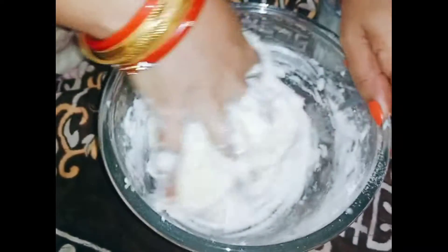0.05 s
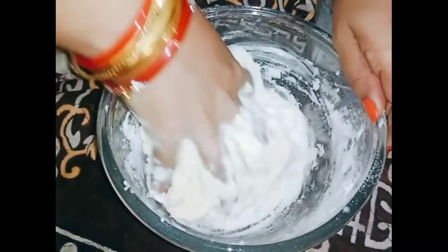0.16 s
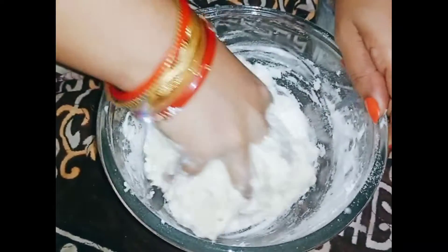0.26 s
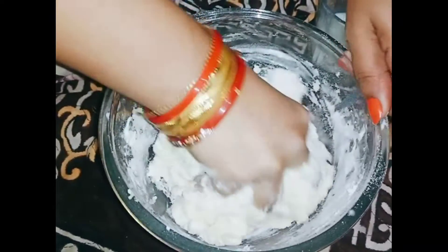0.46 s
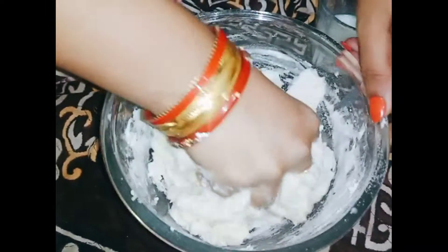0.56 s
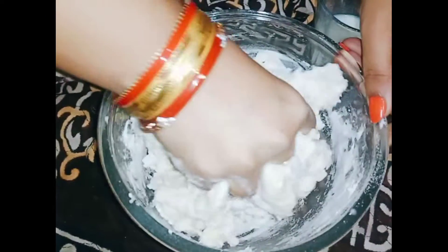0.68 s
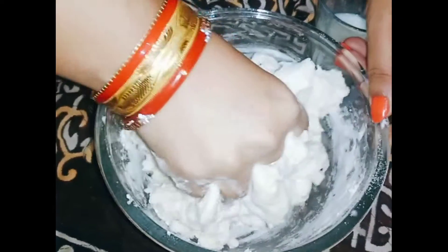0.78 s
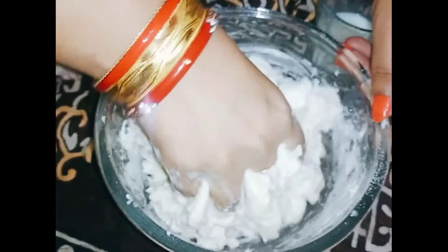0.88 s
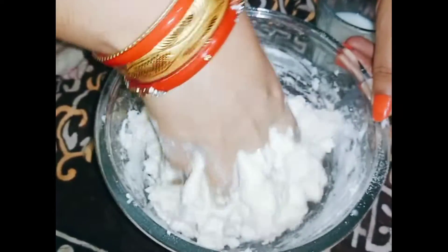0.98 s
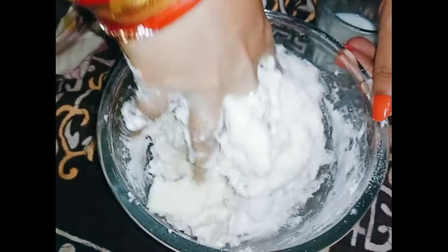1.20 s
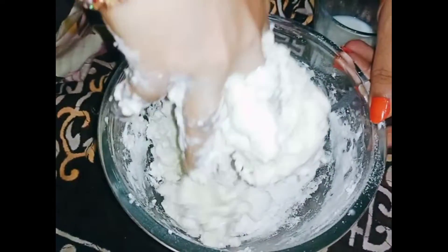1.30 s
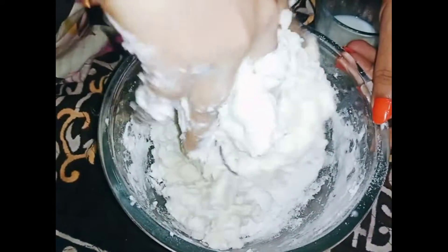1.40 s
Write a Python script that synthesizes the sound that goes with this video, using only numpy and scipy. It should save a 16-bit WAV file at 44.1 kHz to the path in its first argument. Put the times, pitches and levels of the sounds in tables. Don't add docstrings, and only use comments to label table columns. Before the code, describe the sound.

Dough kneading in a glass bowl, heard close in a small room: bright wet crackle and sticky snaps with a low hum at 0-0.1 s. Bangles click near 0.23 s, then strike the bowl sharply at 0.35-0.37 s, the glass ringing and chattering briefly. More clinks come at 0.53-0.6 s. Dense snaps and squelch follow at 0.63-0.85 s with a soft thud, then sparse faint ticks fade towards 1.4 s.

```python
import sys
import numpy as np
from scipy import signal
from scipy.fft import rfft, irfft
from scipy.io import wavfile

SR = 44100
rng = np.random.default_rng(int(sys.argv[2]) if len(sys.argv) > 2 else 0)


def master_out(mix):
    frames = np.transpose(np.atleast_2d(mix))
    ceiling = np.clip(frames, -1, 1)
    pcm = np.round(ceiling * 32767).astype(np.int16)
    wavfile.write(sys.argv[1], SR, pcm)


def invert_db(x):
    u = np.asarray(x, float) / 20
    return 10 ** u


N = 63945
MODE_SCATTER_DB = 3


def unit_power(x):
    return x / np.sqrt(np.mean(x ** 2) + 1e-20)


def in_time(rows):
    s, *columns = np.transpose(rows)
    return [np.interp(np.arange(N) / SR, s, column) for column in columns]


def clicks(s, db):
    out = np.full(N, 1e-18)
    np.add.at(out, (np.asarray(s) * SR).astype(int), invert_db(db))
    return out


def grains(rate):
    size_db = 4.0 * np.minimum(rng.exponential(1, N), 3)
    return invert_db(size_db) * rng.choice([-1, 1], N) * (rng.random(N) < rate / SR)


def burst(x, decay_s):
    envelope = signal.lfilter([1], [1, -np.exp(-1 / (decay_s * SR))], x)
    return envelope * rng.standard_normal(N)


def ring(x, hz, t60):
    r = invert_db(-60 / (t60 * SR))
    w = 2 * np.pi * hz / SR
    return signal.lfilter([0, np.sin(w)], [1, -2 * r * np.cos(w), r * r], x)


def ring_twice(x, hz, t60):
    return ring(ring(x, hz, t60), hz, t60)


def high(x, hz):
    return signal.sosfilt(signal.butter(4, hz, "high", fs=SR, output="sos"), x)


def colour(x, spectrum):
    hz, db = np.transpose(spectrum)
    f = np.maximum(np.arange(N // 2 + 1) * SR / N, 1)
    gain = invert_db(np.interp(np.log(f), np.log(hz), db, left=-60))
    return unit_power(irfft(rfft(x) * gain, N))


def dough():
    # time in seconds, crackle in dB, wetness in dB.
    effort = [(0, -43.5, 2.5), (.09, -59.5, 4.5), (.3, -60.5, 4), (.45, -66.5, 1.5), (.64, -63.5, -2),
              (.74, -53.5, -1), (.8, -53, -1.5), (.89, -74, -9), (.99, -58, -0.5), (1.06, -57.5, -5),
              (1.16, -57, -12), (1.25, -75.5, -14.5), (1.32, -65, -8), (1.38, -79, -13)]
    # frequency in Hz, level in dB.
    crackle_spectrum = [(5000, -39.5), (7500, -25.5), (10000, -13.5), (13500, -1), (14800, -1.5),
                        (15700, 0.5), (16200, -11.5)]
    # frequency in Hz, level in dB.
    squelch_spectrum = [(1180, -14.5), (2000, -19.5), (3130, -12), (3870, 1.5), (4180, -2), (4650, -8),
                        (5650, -8), (9000, -14.5), (11700, -37.5), (19800, -120)]
    crackle_per_s, smooth_share = 1300, .9
    pops_per_s, pop_db, pop_cycles = 1200, -2, 9.7
    squelch_db = -61.5

    effort_db, wet_db = in_time(effort)
    rough = unit_power(grains(crackle_per_s))
    crackle = colour(rough + smooth_share * rng.standard_normal(N), crackle_spectrum)
    pops = np.zeros(N)
    for hz in np.geomspace(3600, 6000, num=10):
        pops += ring_twice(grains(pops_per_s / 10) + 1e-18, hz, pop_cycles / hz)
    hiss = colour(rng.standard_normal(N), squelch_spectrum)
    squelch = hiss + invert_db(pop_db) * unit_power(pops)
    squelch_gain = invert_db(squelch_db + .5 * (effort_db + 54.0) + wet_db)
    return invert_db(effort_db) * crackle + squelch_gain * squelch


def hum():
    # time in seconds, level in dB.
    swell = [(0, -49), (.05, -79), (.2, -63), (.39, -79.5), (.45, -55), (.53, -56.5), (.58, -63.5),
             (.65, -61), (.76, -74.5), (.87, -65.5), (.96, -67), (.995, -67), (1.09, -78), (1.21, -57),
             (1.27, -68.5), (1.42, -65)]
    noise_share = 0.66
    db, = in_time(swell)
    tone = np.sqrt(2) * np.sin(2 * np.pi * 99.5 * np.arange(N) / SR)
    rumble = ring(ring(rng.standard_normal(N), 108.7, 0.046), 140, 0.016)
    rumble = unit_power(high(rumble, 45))
    return invert_db(db) * (np.sqrt(1 - noise_share) * tone + np.sqrt(noise_share) * rumble)


def snaps():
    # start in seconds, peak in dB, wet body against the snap in dB.
    early = [(0.0087, -32, -11), (0.0109, -24, -16), (0.0196, -35, -14), (0.0378, -28, -16),
             (0.0444, -32, -20), (0.0485, -38, -9), (0.0547, -29, -18), (0.0714, -35, -18),
             (0.0943, -41, -12), (0.1715, -38, -20), (0.1999, -44, 0), (0.288, -35, -13), (0.3029, -35, -4),
             (0.3121, -47, -10), (0.3386, -41, -13), (0.3509, -34, -23), (0.4555, -35, -2),
             (0.4721, -30, -18), (0.4988, -36, -18), (0.6103, -34, -14), (0.6321, -36, -11),
             (0.6347, -31, -13), (0.6398, -36, -4), (0.6751, -28, -27), (0.6772, -36, -17),
             (0.6996, -36, -16), (0.7005, -40, -16)]
    # as above, then pitch of the body in Hz.
    late = [(.7229, -42, -12, 3500), (.7257, -35, -20, 4360), (.7302, -33, -7, 4050),
            (.7364, -39, -15, 4000), (.7783, -39, -16, 4400), (.782, -34, -11, 3800),
            (.7847, -35, -6, 4150), (.8004, -27, -16, 4300), (.8022, -31, -13, 4200), (.809, -39, -8, 5300),
            (.8345, -46, -14, 4380), (.864, -47, -16, 5480), (.9125, -56, 12, 3710),
            (.9265, -42, -18, 3720), (.9779, -40, -12, 4600), (.9845, -50, 8, 4250), (1.0225, -52, 2, 4400),
            (1.0421, -45, -5, 3900), (1.0685, -46, -8, 4490), (1.0746, -30, -22, 3850),
            (1.0915, -42, -8, 4700), (1.1086, -33, -19, 5900), (1.1186, -41, -22, 4700),
            (1.1272, -44, -5, 4750), (1.139, -34, -22, 4380), (1.1549, -46, -15, 4070),
            (1.2208, -41, -26, 5380), (1.2735, -52, -18, 4450), (1.3122, -52, -1, 3900),
            (1.319, -50, -16, 3900), (1.337, -54, -4, 4600)]
    early_body_hz = (5670, 3900, 4260)
    snap_hz, snap_t60_s, snap_db, skirt_db = 14700, 0.0012, -1.5, -23
    body_t60_s, splash_db = 0.0042, 1.0

    rows = [(*row, early_body_hz[k % 3]) for k, row in enumerate(early)] + list(late)
    s, db, body_db, body_hz = np.transpose(rows)
    tick = clicks(s, db)
    tick = tick + 0.1 * burst(tick, 0.00027)
    body = np.zeros(N)
    for start, level_db, hz in zip(s, db + body_db, body_hz):
        body += 0.14 * ring_twice(clicks(start, level_db), hz, body_t60_s)
    snap = 2 * invert_db(snap_db - 5) * ring_twice(tick, snap_hz, snap_t60_s)
    splash = invert_db(splash_db) * high(clicks(s, db + body_db), 3400)
    return high(snap + invert_db(skirt_db) * tick, 8400) + high(body, 3300) + splash


def bangles():
    # start in seconds, peak in dB, lower modes against upper in dB,
    # 5-6 kHz modes against the other lower ones in dB, rubbing time in seconds.
    touches = [(.092, -45.5, 5, 6.5, 0.011), (.117, -45, 20.5, -5, 0.0067), (.178, -48.5, 12, 5, 0.0062),
               (0.194, -36.5, 10, 0.5, 0.016), (.214, -28.5, 6.5, 2, 0.0013), (0.217, -27.5, -3, 4, 0.002),
               (0.2337, -8, -4.5, -5, 0.00072), (0.238, -11, -5, -7, 0.0085), (0.255, -29, -13, 13, 0.0015),
               (0.326, -35.5, 10.5, 2.5, 0.0018), (0.355, 2.5, -9, -2, 0.0011),
               (0.3699, -12.5, -0.5, -2, 0.0036), (0.388, -19, 7.5, -5.5, 0.012), (0.411, -21, 0, 0, 0.003),
               (0.424, -22.5, 2, 2, 0.0019), (0.4271, -19.5, -0.5, 7, 0.0074), (.448, -32, -14, -9, .005),
               (.4745, -33, 6, -3, 0.0074), (0.5326, -24, -3, 11.5, 0.0014), (0.538, -8.5, -7, -2, 0.00067),
               (.5435, -8.5, -10, 3, 0.0021), (0.5606, -23.5, -12.5, -9, 0.0009),
               (0.5763, -17, -7, 0, 0.00157), (0.579, -9, -13.5, -2.5, 0.00017),
               (.5795, -5.5, -21.5, -5, 0.001), (0.593, -29.5, -2, -5, 0.018),
               (.612, -31.5, 2.5, -16, 0.026), (0.804, -41.5, 3, 6, 0.0011), (.883, -57, 3.5, 10, 0.011),
               (.969, -44, 1, 9, 0.0042), (.998, -46.5, 0.5, 14.5, 0.0058), (1.223, -51.5, 2, 6.5, 0.0017)]
    modes_hz = [2130, 5360, 6000, 7700, 7790, 10420, 11250, 13330, 14550, 14680, 15100]
    # level in dB, t60 in seconds.
    modes = [(-33.5, 0.059), (-10.5, 0.028), (-11, 0.017), (-10, 0.038), (-12, 0.032), (-16, 0.035),
             (-22, 0.018), (-11, 0.044), (-4, 0.037), (-11, 0.0092), (-13.5, .02)]
    lower_modes_hz, crack_db, crack_s = 9000, -24.5, 0.0033

    t = np.arange(4000) / SR
    scatter_db = MODE_SCATTER_DB * rng.normal(0, 1, (len(touches), len(modes)))
    grit = rng.standard_normal((len(modes) + 1, N))
    rubs = []
    for s, *_, rub_s in touches:
        u = t / np.clip(rub_s, .0003, .03)
        rubs.append((int(s * SR), (1 - np.exp(-3 * u)) * np.exp(-u)))

    out = np.zeros(N)
    for k, (hz, (level_db, t60)) in enumerate(zip(modes_hz, modes)):
        drive = np.full(N, 1e-18)
        for (_, db, low_db, mid_db, rub_s), (i, rub), chance_db in zip(touches, rubs, scatter_db):
            tilt_db = low_db * (hz < lower_modes_hz) + mid_db * (k in (1, 2))
            gain = invert_db(db + level_db + tilt_db + chance_db[k] - 7.5)
            drive[i] += gain * min(0.00049 / max(rub_s, .0003), 1)
            drive[i:i + 4000] += gain * grit[k, i:i + 4000] * rub / np.sqrt(np.sum(rub ** 2))
        out += high(ring(drive, hz, t60), hz * 2 / 3)

    crack = np.zeros(N)
    for (_, db, low_db, _, rub_s), (i, rub) in zip(touches, rubs):
        sharp = min(0.00097 / max(rub_s, .0003), 2) * np.exp(-t / crack_s)
        crack[i:i + 4000] += invert_db(db + crack_db + .5 * low_db) * (rub + sharp)
    return out + high(crack * grit[-1], 3500)


def fingers():
    # start in seconds, end in seconds, level in dB, pitch in Hz, t60 in seconds.
    slides = [
        (.62, 0.785, -72, 2550, 0.014),
        (.37, .5, -64, 619, 0.49),
        (0.097, 0.13, -69.5, 1640, .06),
        (0.16, 0.18, -78.5, 1250, 0.044),
        (.15, 0.2, -58.5, 5310, 0.05),
        (1, 1.06, -74, 1350, 0.0056),
        (0.443, 0.5, -65.5, 1637, 0.071),
    ]
    # start in seconds, level in dB, pitch in Hz, t60 in seconds.
    thuds = [
        (.755, -57, 340, .06),
        (.993, -60, 270, .03),
        (.356, -54, 400, .03),
        (1.274, -59, 950, .007),
        (.3545, -36, 2150, .008),
    ]
    t = np.arange(N) / SR
    out = np.zeros(N)
    for s, db, hz, t60 in thuds:
        out += high(ring(clicks(s, db), hz, t60), 150)
    for start, end, db, hz, t60 in slides:
        swell = np.sqrt(np.sin(np.pi * np.clip((t - start) / (end - start), 0, 1)).clip(0))
        note = unit_power(swell * ring_twice(rng.standard_normal(N), hz, t60))
        out += invert_db(db) * note * np.sqrt((end - start) * SR / N)
    return out


def bowl():
    # start in seconds, peak in dB, dull knock in dB.
    knocks = [(0.3542, -22.5, -25), (.3682, -17.5, -32.5), (0.38, -33.5, -43), (0.389, -49, -41.5),
              (.413, -36, -55), (0.431, -31.5, -65), (0.44, -35, -74), (0.474, -41.5, -76),
              (0.489, -50, -62.5), (0.513, -58.5, -70), (0.996, -69, -51.5), (1.275, -76, -66)]
    modes_hz = [619, 1637, 3045, 3650, 5860, 6830, 8720, 12840, 13780, 3390, 4811, 9135, 12010, 4250]
    # level in dB, t60 in seconds.
    modes = [(-41, .1), (-21, 0.078), (-19, 0.062), (-6, 0.022), (-7.5, 0.017), (-8.5, 0.051),
             (-6.5, 0.025), (-3.5, 0.041), (-0.5, .012), (-9, 0.031), (-13, 0.085), (-16, 0.032),
             (-12, .015), (-13.5, 0.032)]
    # start in seconds, level in dB.
    rim_blows = [
        (.3548, -26),
        (0.3684, -14.5),
        (0.371, -24.5),
        (.378, -24.5),
    ]
    chatter_end_s, chatter_db, loss_db_per_s, touches_per_s = 0.8, -43, 65, 700
    wash_db = 2.5

    s, db, knock_db = np.transpose(knocks)
    start = rim_blows[1][0]
    t = np.arange(N) / SR
    chatter = (rng.random(N) < touches_per_s / SR) * (t > start) * (t < chatter_end_s)
    chatter = chatter * invert_db(chatter_db - loss_db_per_s * (t - start))
    scatter_db = MODE_SCATTER_DB * rng.normal(0, 1, (len(s), len(modes)))

    out = high(ring(clicks(*np.transpose(rim_blows)), 4817, 0.058), 3500)
    for k, (hz, (level_db, t60)) in enumerate(zip(modes_hz, modes)):
        struck = clicks(s, db + scatter_db[:, k]) + chatter * rng.standard_normal(N)
        out = out + invert_db(level_db) * high(ring(struck, hz, t60), hz * 2 / 3)

    scuff = ring(burst(clicks(s, knock_db - 10.5), 0.0025), 1900, 0.0038)
    knock = scuff + ring(clicks(s, knock_db), 1204, 0.014)
    wash_band = signal.butter(3, (3100, 6600), "band", fs=SR, output="sos")
    wash = signal.sosfilt(wash_band, burst(chatter + clicks(s, db - 11), 0.0012))
    return out + high(knock, 700) + invert_db(wash_db) * wash


def room(x):
    t60_s, level_db = .15, -13
    t = np.arange(int(.4 * SR)) / SR
    tail = rng.standard_normal(len(t)) * invert_db(-60 * t / t60_s) * (t > .003)
    tail = tail / np.sqrt(np.sum(tail ** 2))
    return invert_db(level_db) * signal.fftconvolve(x, tail)[:N]


def air_hiss():
    # frequency in Hz, level in dB.
    air_spectrum = [(100, -31.5), (170, 0.5), (641, -19.5), (718, -12), (1500, -15), (2760, -24.5),
                    (15800, -44)]
    return invert_db(-76.5) * colour(rng.standard_normal(N), air_spectrum)


def scene():
    # centre in seconds, depth in dB, half width in seconds.
    pauses = [
        (.346, -7.5, 0.012),
        (.759, -19, 0.0047),
        (1.445, -3.5, 0.0089),
    ]
    t = np.arange(N) / SR
    still_db = sum(db * np.exp(-((t - s) / half) ** 2) for s, db, half in pauses)
    hits = bangles() + bowl() + snaps()
    near = hits + room(hits) + dough() + fingers() + air_hiss()
    return (invert_db(still_db) * near + hum())[None]


def top_cut(x):
    return signal.sosfilt(signal.butter(12, 16620, fs=SR, output="sos"), x)


def record(dry):
    cutoff_hz = 15700
    low_pass = signal.cheby2(14, 27, cutoff_hz + SR / 600, fs=SR, output="sos")
    mix = signal.sosfilt(low_pass, dry)
    return top_cut(mix)


dry = scene()
out = record(dry)
master_out(out)
```